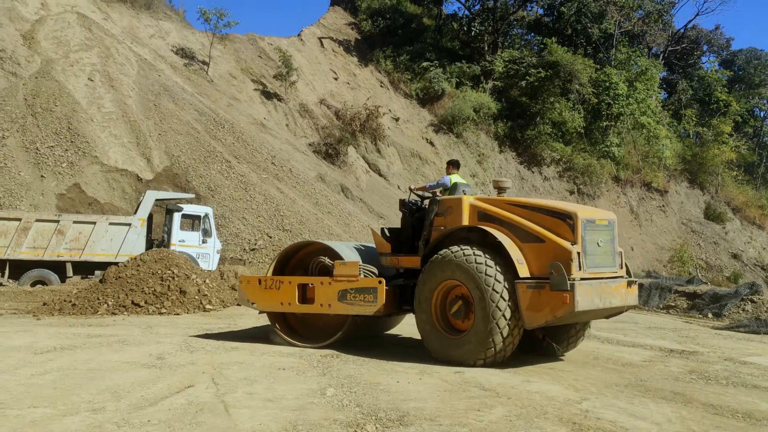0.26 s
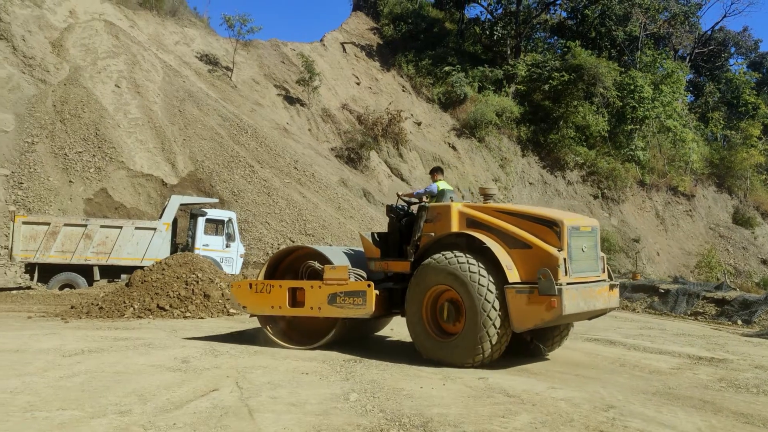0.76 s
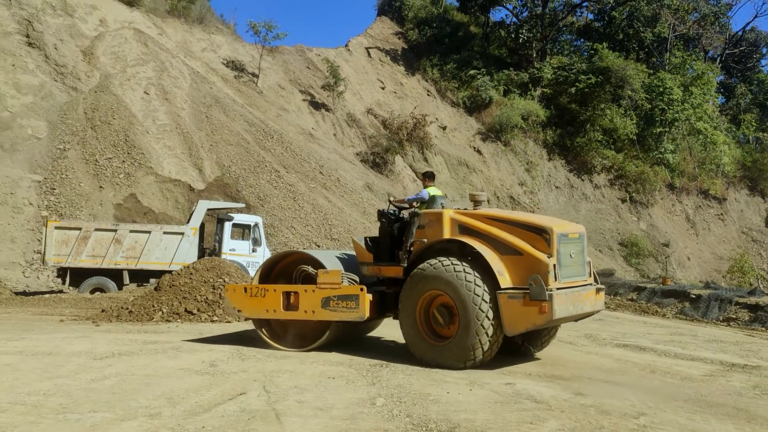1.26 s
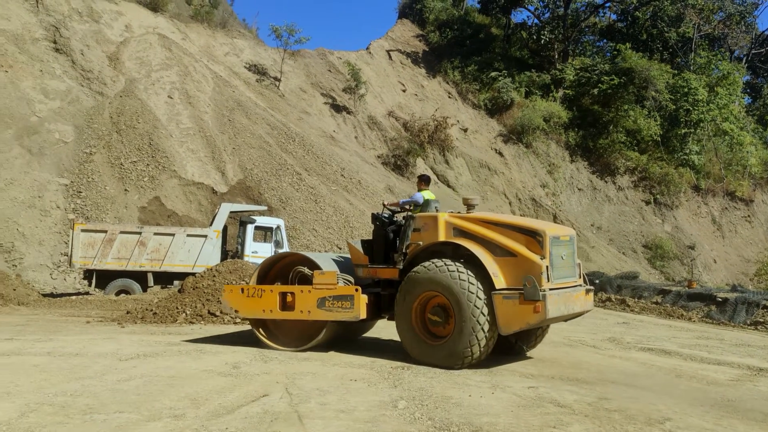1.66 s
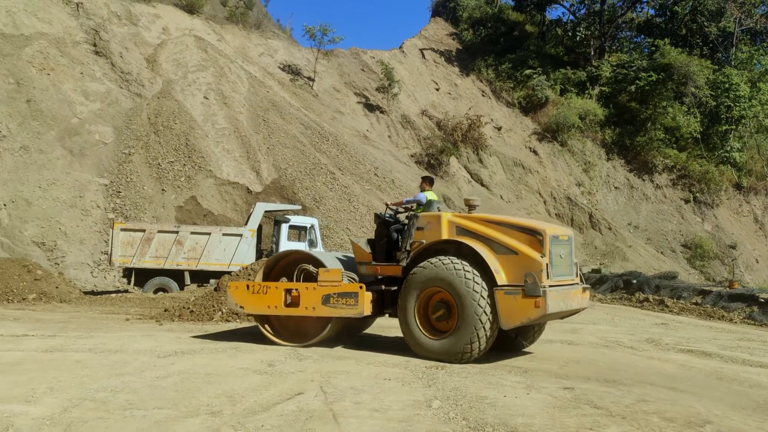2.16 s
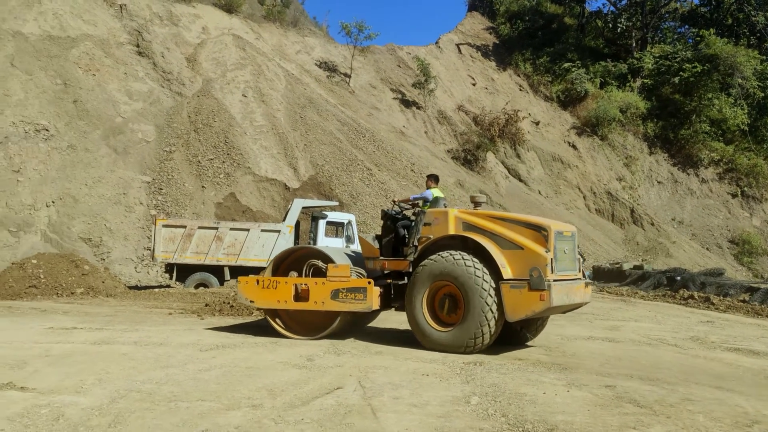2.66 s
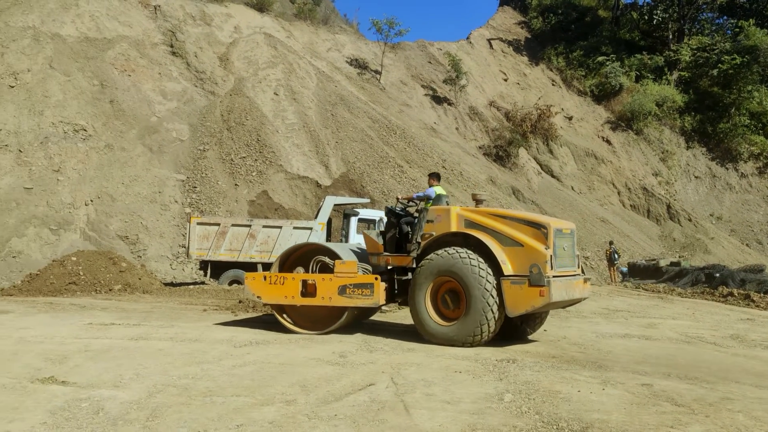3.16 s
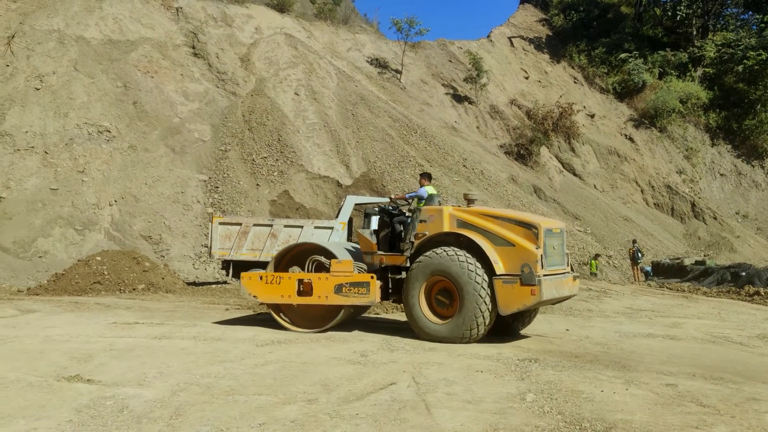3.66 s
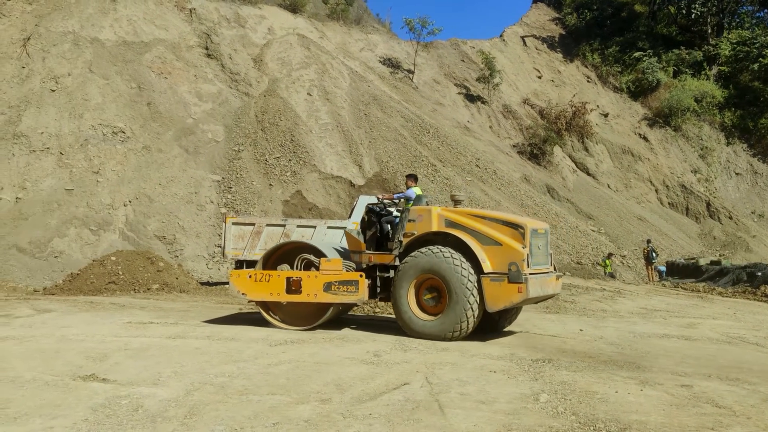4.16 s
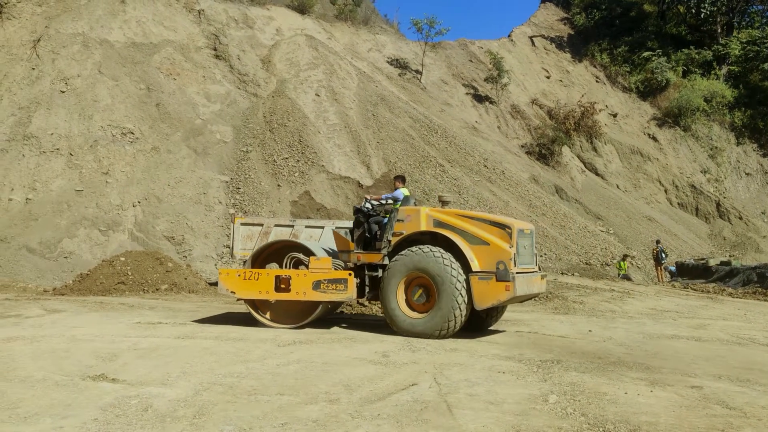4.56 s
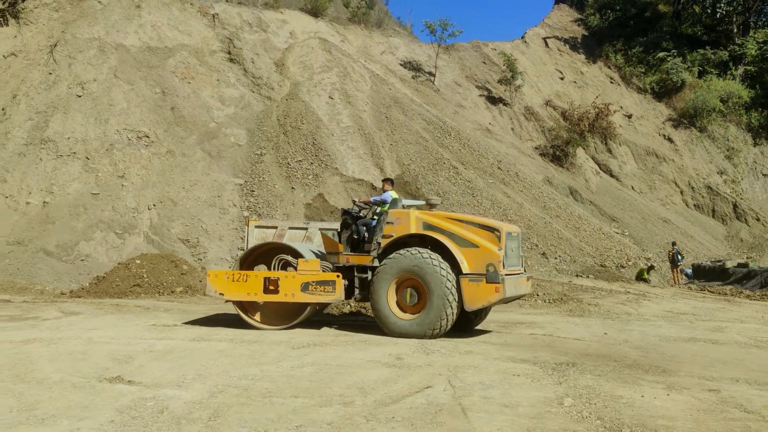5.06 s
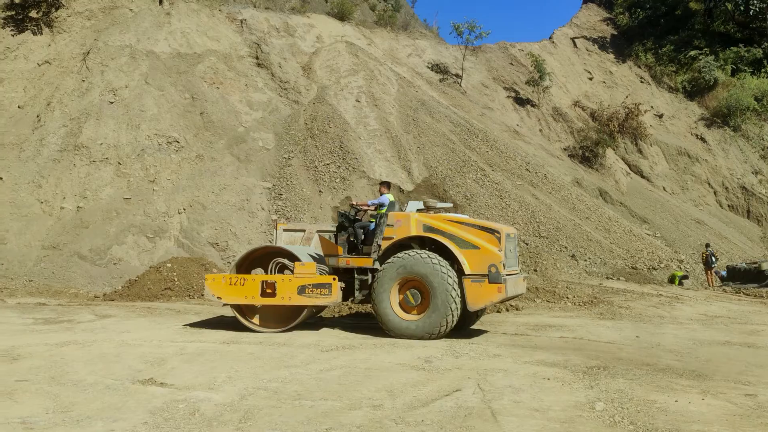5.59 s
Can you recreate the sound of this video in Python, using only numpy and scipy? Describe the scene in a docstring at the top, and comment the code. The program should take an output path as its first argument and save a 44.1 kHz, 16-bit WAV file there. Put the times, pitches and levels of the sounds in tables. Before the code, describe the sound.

A road roller creeps over dirt beside a bare quarry slope. Its diesel holds a nearly constant speed, dominated by a deep, smooth exhaust hum with a wavering fan drone above it. Quieter growl, knock and hiss add mechanical texture. Tiny thin squeaks come mostly in the first two and a half seconds, then a faint whine glides downward. Outdoors, dry, single microphone at a moderate distance.

```python
"""Road roller on dirt

A road roller creeps over dirt below a quarry slope, its six-cylinder diesel at a nearly steady speed.
The exhaust hums as a sine at the firing rate, and lines of the engine cycle add the throb of unequal
cylinders. The block growls, knocks and hisses: repeating blows mixed with puffing noise. The fan is a
wavering tone with its octave in a rush of noise. A gliding sine makes the hydraulic drive whine,
random touches make sheet metal rattle, and short sines make faint, thin squeaks."""
import sys
import numpy as np
from scipy import signal
from scipy.fft import rfft, irfft
from scipy.io import wavfile
from scipy.ndimage import uniform_filter1d

SR = 44100
rng = np.random.default_rng(int(sys.argv[2]) if len(sys.argv) > 2 else 0)


def generate_wav(sig):
    """Save sig (samples, or channels by samples) to the path in sys.argv[1] as 16-bit PCM at SR."""
    pcm = np.round(np.clip(np.atleast_2d(sig).T, -1, 1) * 32767).astype(np.int16)
    wavfile.write(sys.argv[1], SR, pcm)


N = 257103   # length in samples

# Thin squeaks. Each row: start in seconds, length in seconds, middle pitch in Hz,
# peak of the plain whistle in dB, rasp from 0 to 1.
SQUEAKS = [(0.013, .03, 5480, -61, .5), (0.192, .035, 5520, -65, .4), (0.404, .035, 5540, -68, .4),
           (0.696, 0.039, 5550, -56.5, 0.4), (1.098, .03, 5480, -65, .5), (1.164, 0.044, 4070, -48.5, 0.9),
           (1.234, 0.03, 5720, -59, 0.7), (1.420, 0.033, 5800, -63, .3), (2.134, 0.033, 6620, -57.5, .3),
           (2.331, 0.037, 6700, -55, .2), (5.12, .03, 6600, -67.5, 0.65)]

# Bouts of loose sheet metal rattling on the engine.
# Each row: time of the top in seconds, half-width in seconds, peak in dB.
RATTLE_BOUTS = [(0.65, 1.2, -54.5), (4.0, 1.4, -54.5)]
# Ring of the sheet metal. Each row: frequency in Hz, relative density in dB per Hz.
PANEL_SPECTRUM = [(2000, -29), (2400, -8), (2750, 0), (3050, -5.5), (3500, -24)]

# Hydraulic drive whine, sinking in pitch. Each row: time in seconds, pitch in Hz, level in dB.
DRIVE_WHINE = [(2.7, 440, -70), (3.05, 436.5, -43), (3.33, 426, -40), (3.58, 403, -40),
               (3.95, 394.6, -41.5), (4.4, 385, -42.5), (4.9, 384, -59)]

# Blade tone of the cooling fan, before its gusts. Each row: time in seconds, level in dB.
FAN_LEVEL = [(0, -30.5), (0.5, -32.5), (0.6, -21), (0.78, -27.5), (0.95, -21.5), (1.3, -27.5), (4.7, -26),
             (5.2, -21.5), (5.83, -21)]
# Rush of the fan's air. Each row: frequency in Hz, relative density in dB per Hz.
AIR_SPECTRUM = [(10, -25), (40, -11), (90, -10), (170, -7.5), (205, -14.5), (240, -4.5), (280, 0),
                (315, -4), (345, -14.5), (450, -28)]
BLADES_PER_FIRING = 2.8714   # fan blades passing at each firing
# The octave of the fan is steady, apart from its gusts, then dies away late, well after the machine's turn.
OCTAVE_DB, OCTAVE_FADES_AT_S, OCTAVE_FADE_DB_PER_S = -37.5, 4.0, 5.5
AIR_START_DB, AIR_FADE_DB_PER_S = -27, 1.2   # fades as the roller moves off

# Engine speed. Each row: time in seconds, firings per second.
ENGINE_SPEED = [(0, 101.24), (0.35, 101.86), (0.8, 100.91), (1.95, 101.67), (2.25, 101.33), (3.6, 100.79),
                (4.5, 101.07), (5.1, 100.55), (5.83, 101.48)]
# Relative strength of each cylinder, in firing order. Each entry: level in dB.
CYLINDER_DB = [2.2, 0.6, 1.1, 0.26, 0.064, -1]

# Colours of the block's three parts. Each row: frequency in Hz, relative density in dB per Hz.
GROWL_SPECTRUM = [(250, -25.5), (340, -3), (385, 5), (480, 1.5), (600, 0.5), (700, -2), (820, -5),
                  (920, -10.5), (1200, -32.5)]
KNOCK_SPECTRUM = [(650, -23.5), (930, -3), (1060, -0.5), (1250, -3), (1430, -7), (1720, -8), (2100, -16.5),
                  (2800, -37)]
HISS_SPECTRUM = [(1500, -16.5), (2250, -1), (2800, 1), (3400, -5.5), (4500, -8), (5300, -18), (6000, -27),
                 (6500, -24.5), (7000, -21), (9400, -32), (10700, -30), (11800, -36.5), (13200, -39),
                 (16000, -50)]
# Brief swells of the knock.
# Each row: time of the top in seconds, half-width in seconds, gain added to the steady gain of 1, in dB.
KNOCK_SWELLS = [(2.75, .15, -14.5), (5.45, 0.13, -16.5)]
GROWL_START_DB, GROWL_FADE_DB_PER_S = -32.5, 0.12   # fades as the roller moves off
KNOCK_DB = -42.5   # between its swells
HISS_START_DB = -51.5
# The engine's side turns towards the listener and its hiss comes up: middle of the turn, duration, rise.
TURN_AT_S, TURN_TAKES_S, TURN_HISS_DB = 2.7, 0.71, 1.5

# Exhaust lines from unequal cylinders, before their unsteadiness.
# Each row: multiple of the two-turn engine cycle, level in dB.
THROB_LINES = [(2, -46.5), (3, -44), (4, -46.5), (5, -47), (7, -39), (8, -44.5), (9, -49), (11, -47.5),
               (12, -44.5), (13, -39.5), (14, -51), (15, -38.5), (16, -39), (17, -41.5), (18, -34),
               (19, -46.5), (22, -48), (33, -50), (37, -50), (40, -48.5), (41, -50), (42, -52.5),
               (43, -52.5), (45, -48), (51, -50.5), (54, -55), (56, -54), (62, -59.5), (72, -61)]
# Sixth harmonic of the firing, swelling and fading as the machine moves.
# Each row: time of the top in seconds, half-width in seconds, peak in dB.
OVERTONE_SWELLS = [(0.55, .5, -43.5), (1.95, 0.25, -37.5), (4.55, 0.8, -33.5)]
# Two booming lines, lower then upper. Each entry: multiple of the engine cycle.
BOOM_MULTIPLES = (10, 11)
# Swell of the upper boom, shared in part by the lower.
# Each row: time of the top in seconds, half-width in seconds, peak in dB before unsteadiness.
BOOM_SWELLS = [(2.52, .3, -36.5)]
HUM_DB = -17   # exhaust hum at the firing rate
BOOM_START_DB, BOOM_FADE_DB_PER_S = -35.5, 0.5   # lower boom, without its swell
BOOM_SHARE = 0.6   # share of the swell's amplitude in the lower boom

CUTOFF_HZ = 15400


def from_db(db):
    """Definition of the decibel: amplitude gain is ten to the power dB / 20."""
    return 10 ** (np.asarray(db) / 20)


def rms_one(x):
    """Normalisation of power: the mean square is scaled to one."""
    return x / np.sqrt(np.mean(x ** 2) + 1e-20)


def seconds():
    """Uniform sampling: the time of every sample."""
    return np.arange(N) / SR


def in_time(rows):
    """Linear interpolation: each column of a curve, sample by sample."""
    times, *columns = np.transpose(rows)
    return [np.interp(seconds(), times, column) for column in columns]


def swells(rows):
    """Gaussian envelope: gain rises and falls in one smooth bell for each row."""
    return sum(from_db(db) * np.exp(-((seconds() - top) / width) ** 2) for top, width, db in rows)


def drift(rate):
    """Low-pass noise: a random course of unit spread, changing about rate times a second."""
    hz = np.fft.rfftfreq(N, 1 / SR)
    white = rfft(rng.standard_normal(N))
    return rms_one(irfft(white / (1 + (hz / rate) ** 2), N))


def coloured(x, spectrum):
    """Linear filtering: the spectrum is shaped over log frequency, at unit rms."""
    hz, db = np.transpose(spectrum)
    log_hz = np.log(np.fft.rfftfreq(N, 1 / SR) + 1e-3)   # the small term avoids log of zero
    gain = from_db(np.interp(log_hz, np.log(hz), db, left=-np.inf, right=-np.inf))
    return rms_one(irfft(rfft(x) * gain, N))


def tone(turns):
    """Phase accumulation: a sinusoid of unit rms follows a count of turns."""
    return np.sqrt(2) * np.cos(2 * np.pi * turns)


def squeaks(sag, rasp_hz, octave_db, lower_ratio, lower_db):
    """Frequency modulation: sinking whistles roughen under random shaking, which stirs a lower mode."""
    out = np.zeros(N)
    for start_s, length_s, hz, db, rasp in SQUEAKS:
        progress = np.linspace(0, 1, int(length_s * SR))
        noise = uniform_filter1d(rng.standard_normal(SR // 4), size=40)
        shake = rms_one(noise)[:len(progress)]
        pitch_hz = hz * (1 - sag * (progress - 0.5)) + rasp * rasp_hz * shake
        turns = np.cumsum(pitch_hz) / SR
        whistle = np.sin(2 * np.pi * turns)
        whistle += rasp * from_db(octave_db) * np.sin(4 * np.pi * turns)
        whistle += rasp * from_db(lower_db) * np.sin(2 * np.pi * lower_ratio * turns)
        start = max(int(start_s * SR), 0)
        out[start:start + len(progress)] += from_db(db) * np.sin(np.pi * progress) * whistle
    return out


def rattle(touches_per_s, clump_db):
    """Impulsive excitation of a resonator: dense touches, in uneven clumps, set a panel ringing."""
    touched = rng.random(N) < touches_per_s / SR
    touches = touched * rng.standard_normal(N) * from_db(clump_db * drift(18))
    return swells(RATTLE_BOUTS) * coloured(touches, PANEL_SPECTRUM)


def drive():
    """Tonal machine noise: the hydraulic motor sings faintly at a gliding pitch."""
    hz, db = in_time(DRIVE_WHINE)
    return from_db(db) * tone(np.cumsum(hz) / SR)


def fan(firings, gust_db, octave_gust_db, wander):
    """Blade-passing noise: belt-driven blades chop uneven air into a tone, its octave and a low rush."""
    blade_db, = in_time(FAN_LEVEL)
    octave_db = OCTAVE_DB - OCTAVE_FADE_DB_PER_S * np.maximum(seconds() - OCTAVE_FADES_AT_S, 0)
    air_db = AIR_START_DB - AIR_FADE_DB_PER_S * seconds()
    blades = BLADES_PER_FIRING * firings + wander * drift(2.7)
    drone = from_db(blade_db + gust_db * drift(27)) * tone(blades)
    octave = from_db(octave_db + octave_gust_db * drift(9.6)) * tone(2 * blades)
    rush = from_db(air_db) * coloured(rng.standard_normal(N), AIR_SPECTRUM)
    return drone + octave + rush


def combustion(firings, ring_s, jitter_s, scatter_db):
    """Impulse response: each cylinder's blows shake the block with a decaying rattle of its own."""
    number = np.arange(1, int(firings[-1]))
    on_time = np.interp(number, firings, np.arange(N))   # in samples
    at = on_time + jitter_s * SR * rng.standard_normal(len(number))
    force = from_db(scatter_db * rng.standard_normal(len(number)))
    age = np.arange(SR // 20) / SR
    out = np.zeros(N)
    for cylinder, db in enumerate(CYLINDER_DB):
        own = number % len(CYLINDER_DB) == cylinder
        blows = np.zeros(N)
        blows[np.clip(at[own], 0, N - 1).astype(int)] = force[own] * from_db(db)
        ring = rng.standard_normal(len(age)) * np.exp(-age / ring_s)   # same at every blow
        out += signal.fftconvolve(blows, ring)[:N]
    return out


def engine_part(firings, blows, spectrum, regular_db, puff_db):
    """Periodic and modulated noise: repeating blows mix with turbulence that puffs at every firing."""
    cylinder_db = np.array(CYLINDER_DB)[firings.astype(int) % len(CYLINDER_DB)]
    puff_gain = from_db(puff_db * np.sin(2 * np.pi * firings) + 0.5 * cylinder_db)
    puffs = rng.standard_normal(N) * puff_gain
    regular = from_db(regular_db) * coloured(blows, spectrum)
    return rms_one(coloured(puffs, spectrum) + regular)


def exhaust(firings, unsteady_db, wander):
    """Fourier series of a pulse train: a clean hum, and weaker lines at multiples of the cycle."""
    hum = from_db(HUM_DB) * tone(firings)
    cylinders = len(CYLINDER_DB)
    cycles = firings / cylinders
    offsets = rng.random(size=100)   # in turns
    upper_boom = swells(BOOM_SWELLS)
    steady_boom = from_db(BOOM_START_DB - BOOM_FADE_DB_PER_S * seconds())
    lower_boom = steady_boom + BOOM_SHARE * upper_boom
    lines = [(multiple, from_db(db)) for multiple, db in THROB_LINES]
    lines += zip(BOOM_MULTIPLES, (lower_boom, upper_boom))
    throb = np.zeros(N)
    for multiple, gain in lines:
        apart = multiple - cylinders
        # crank speed ripples within a cycle, so lines either side of the hum oppose each other
        offset = offsets[apart] if apart > 0 else 0.5 - offsets[-apart]
        unrest = np.sqrt(multiple / cylinders)   # shorter waves waver more on their way over the ground
        line = tone(multiple * cycles + offset + wander * unrest * drift(1.6))
        throb += gain * from_db(unsteady_db * unrest * drift(4.3)) * line
    overtone = swells(OVERTONE_SWELLS) * tone(6 * firings)
    return hum + throb + overtone


def scene():
    """Superposition: one crankshaft phase drives exhaust, block and fan, and the other sounds add."""
    firing_hz, = in_time(ENGINE_SPEED)
    firings = np.cumsum(firing_hz) / SR
    chirps = squeaks(sag=0.015, rasp_hz=220, octave_db=-13.0, lower_ratio=0.9, lower_db=0.0)
    panel = rattle(touches_per_s=2500, clump_db=2.7)
    whine = drive()
    drone = fan(firings, gust_db=1.5, octave_gust_db=2.26, wander=0.028)   # wander in turns

    blows = combustion(firings, ring_s=0.012, jitter_s=0.00006, scatter_db=1.0)
    growl_gain = from_db(GROWL_START_DB - GROWL_FADE_DB_PER_S * seconds())
    growl = growl_gain * engine_part(firings, blows, GROWL_SPECTRUM, regular_db=-4.0, puff_db=0.9)
    knock_gain = from_db(KNOCK_DB) * (1 + swells(KNOCK_SWELLS))
    knock = knock_gain * engine_part(firings, blows, KNOCK_SPECTRUM, regular_db=-4, puff_db=-0.5)
    turned = np.clip((seconds() - TURN_AT_S) / TURN_TAKES_S + 0.5, 0, 1)
    hiss_gain = from_db(HISS_START_DB + TURN_HISS_DB * turned)
    hiss = hiss_gain * engine_part(firings, blows, HISS_SPECTRUM, regular_db=-7.5, puff_db=0.6)

    hum = exhaust(firings, unsteady_db=0.99, wander=0.013)   # wander in turns
    return (chirps + panel + whine + drone + growl + knock + hiss + hum)[None]


def record(dry):
    """Windowing and low-pass filtering: the ends ease over 4 ms and the top of the treble is cut."""
    to_edge = np.minimum(np.arange(N), np.arange(N)[::-1]) / SR
    ease = np.sin(np.pi / 2 * np.minimum(to_edge / 0.004, 1)) ** 2
    low_pass = signal.cheby1(10, 0.1, CUTOFF_HZ, fs=SR, output="sos")   # tenth order, 0.1 dB ripple
    return signal.sosfilt(low_pass, dry * ease)


dry = scene()
out = record(dry)
generate_wav(out)
```